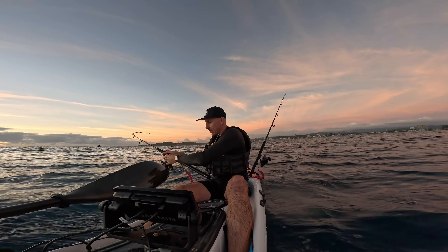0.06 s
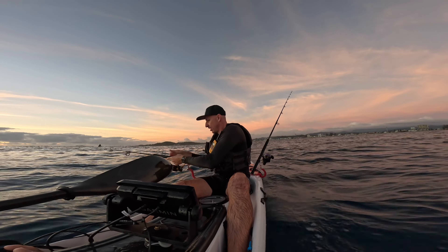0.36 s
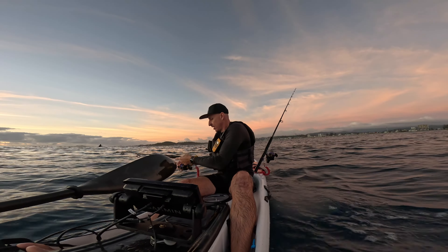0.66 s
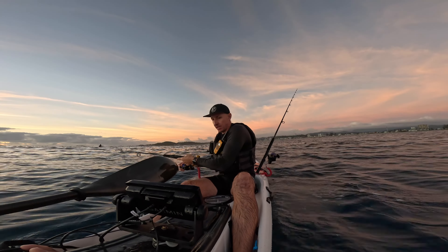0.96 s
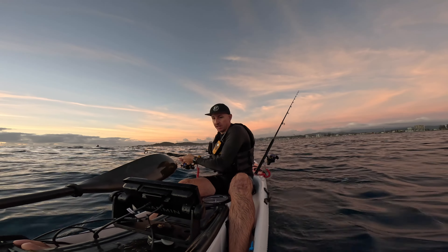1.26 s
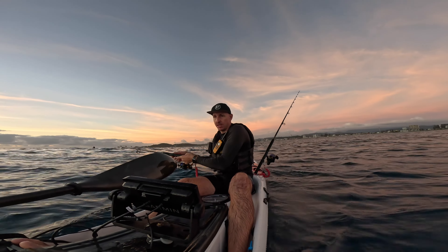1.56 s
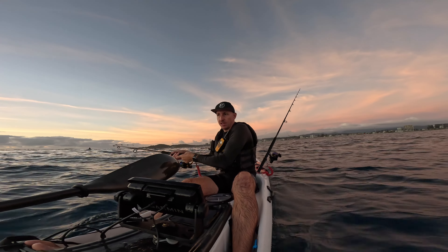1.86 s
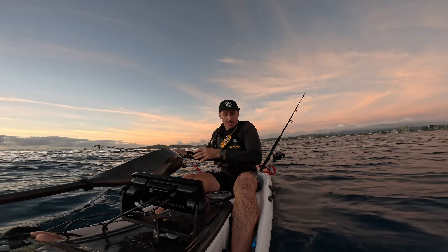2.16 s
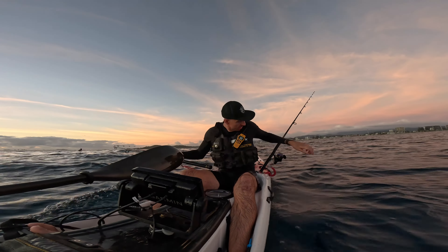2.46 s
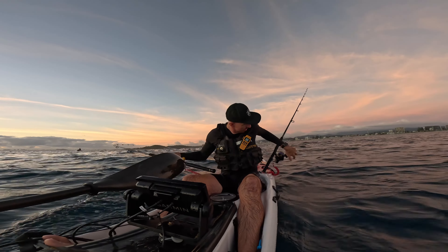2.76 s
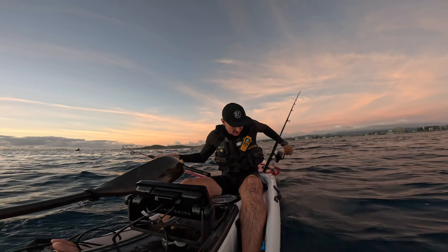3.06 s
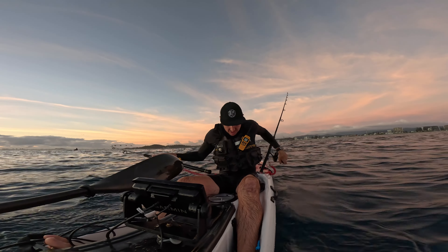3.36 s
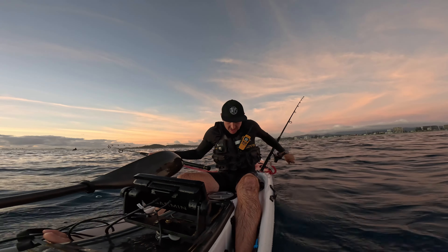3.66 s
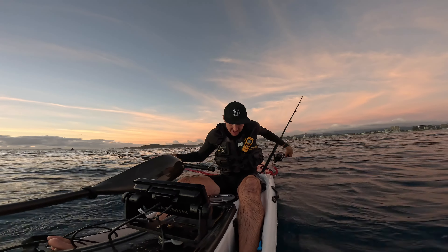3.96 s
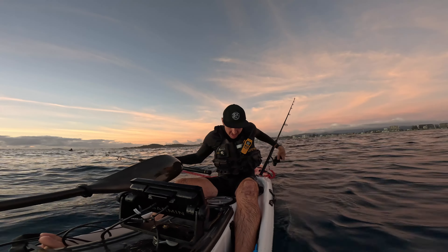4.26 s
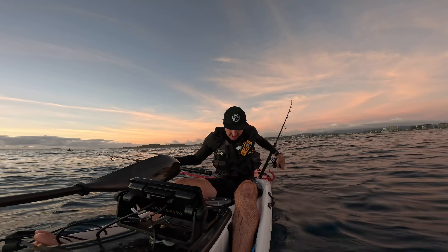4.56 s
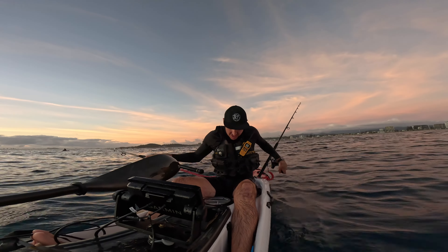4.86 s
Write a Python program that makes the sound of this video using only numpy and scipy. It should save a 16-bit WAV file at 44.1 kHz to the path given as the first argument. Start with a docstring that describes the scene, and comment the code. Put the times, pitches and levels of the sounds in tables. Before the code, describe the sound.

Two fishing reels whine as line runs out, over a low hum, water sloshing against a kayak and wind buffeting the microphone.

```python
"""On a kayak at sea, a hand reel gives line: its pawl (a small catch) clicks so fast that it whines.
A taut line hums, lower as the boat slows; water slops, wind buffets the microphone and tackle ticks.
After a second, a reel in the rod holder swells in; then the fish starts tugging at the hand reel.
From about 4 seconds a rotor chirps, and tackle knocks twice on the hull. Near 7 seconds the holder reel
stops dead and the hand reel slows to single clicks, then runs off again in stronger wind."""
import sys
import numpy as np
from scipy import signal
from scipy.fft import rfft, irfft, next_fast_len
from scipy.io import wavfile
from scipy.ndimage import uniform_filter1d, map_coordinates

SR = 44100
rng = np.random.default_rng(int(sys.argv[2]) if len(sys.argv) > 2 else 0)


def dump(signal):
    """Clip the signal to [-1, 1] and save it as 16-bit WAV at the path in sys.argv[1]."""
    limited = np.clip(np.atleast_2d(signal).T, -1, 1)
    pcm = np.round(limited * 32767).astype(np.int16)
    wavfile.write(sys.argv[1], SR, pcm)


N = 397341

# The hand reel's speed between lunges. Each row: time in seconds, clicks per second.
HAND_SPEED = [(0, 460), (4.6, 399), (6.2, 637), (6.82, 55), (7, 63), (7.18, 40), (7.31, 76), (7.39, 30),
              (7.54, 90), (7.66, 22), (7.73, 62), (7.82, 50), (7.96, 131), (8.2, 547), (9, 714)]
# Its loudness between tugs and lunges. Each row: time in seconds, spool ring in dB, pawl spring in dB.
HAND_LEVELS = [(.15, -48, -56.5), (.55, -51, -61.5), (1.6, -55.5, -49.5), (2, -45.5, -52),
               (3.7, -44.5, -46), (4.4, -45.5, -48), (5.15, -38.5, -46.5), (6.15, -45.5, -42.5),
               (6.9, -44.5, -52), (7.45, -51, -54.5), (7.85, -45.5, -54.5), (8.2, -31, -37.5),
               (9, -33, -42.5)]
# Its spool's note. Each row: time in seconds, pitch in Hz.
SPOOL_PITCH = [(.8, 1733), (2.2, 1685), (7.8, 1667), (9, 1718)]
# Its body's rattle, before a cap. Each row: time in seconds, level in dB.
RATTLE_LEVEL = [(1.5, -70), (6.85, -61.5), (7.87, -56), (8.18, -41.5), (9.01, -38)]
# How its spring and body ring. Each row: pitch in Hz, width in Hz, level in dB.
SPRING_RING = [(3688, 130, 26), (3988, 290, 22.5)]
HAND_BODY_RING = [(2300, 300, 2), (3070, 170, 3.5), (5650, 310, 0), (11000, 230, -22)]
# Tugs swell the spool's ring; in lunges the spool races and the spring buzzes.
# Each row: middle in seconds, length in seconds, boost in dB.
TUGS = [(2.12, 0.064, 6.5), (2.35, 0.048, 8), (2.88, 0.2, 12.5), (3.16, 0.095, 10.5), (3.32, 0.1, 10),
        (3.52, 0.086, 7), (5.68, 0.082, 6), (6.15, 0.21, 11.5), (7.292, .095, 8.9), (7.54, 0.16, 12.5),
        (8.29, 0.043, 10), (8.91, 0.11, 7)]
LUNGES = [(1.87, .28, 9), (2.78, .38, 8.5), (3.2, .44, 11), (4.9, .07, 7.5), (5.13, .27, 11)]
# The taut line's hum. Each row: time in seconds, pitch in Hz, level in dB.
LINE_HUM = [(0.0, 124.1, -36.5), (1, 121.7, -29), (2.87, 118.4, -31.5), (3.92, 107.4, -27.5),
            (4.98, 105.2, -30), (5.45, 98.8, -35.5), (6.7, 96.6, -32.5)]
# The freshening breeze. Each row: time in seconds, buffet in dB, rush in dB.
WIND_LEVELS = [(0, -37, -35.5), (1.2, -34, -31.5), (4.7, -34, -33.5), (6, -23.5, -30.5), (6.9, -26, -31),
               (7.9, -21, -27.5), (8.3, -17, -21.5), (8.85, -25, -32)]
# Gusts on top. Each row: middle in seconds, length in seconds, buffet boost in dB, rush boost in dB.
GUSTS = [(1.68, .12, 10, 0.5), (2.87, 0.089, 12, 2.5), (4.97, 0.073, 11.5, -1), (5.23, 0.09, 14, 0),
         (6.01, 0.079, 8, 1), (6.44, 0.1, 10, 1.5), (6.69, 0.14, 11, 1), (7, 0.061, 9.5, 4.5),
         (7.7, .08, 7.5, 12.5), (8.13, 0.12, 3.5, 4.5), (8.98, 0.091, 5, 15)]
# Water washing along the hull. Each row: time in seconds, level in dB.
WASH_LEVEL = [(0.0, -41), (0.58, -47), (1.4, -41.5), (6.52, -39), (7.2, -48.5), (8.4, -38)]
# Bigger slops. Each row: start in seconds, level in dB, bubble pitch in Hz.
SLOPS = [(0.023, -24, 587), (1.84, -27, 682), (2.02, -31, 1140), (2.405, -27, 840), (7.683, -26, 482),
         (7.818, -25, 616), (8.028, -22, 284), (8.118, -26, 330), (8.325, -22, 290), (8.417, -15, 421.2),
         (8.596, -19, 610)]
# The tone of each noisy sound. Each row: frequency in Hz, relative level in dB.
HAND_RASP_TONE = [(400, -26), (1100, -17), (2500, -7), (4400, -6.5), (6400, -3), (7600, -20),
                  (10000, -18.5), (14000, -47)]
BUFFET_TONE = [(12, -7), (28, -4), (70, -8), (140, -22.5), (2400, -120)]
RUSH_TONE = [(40, -7), (150, -1), (300, -8.5), (520, -20.5), (2000, -51.5), (9000, -120)]
WASH_TONE = [(420, 1), (1100, -5), (2000, -9), (15000, -42)]
HOLDER_RASP_TONE = [(400, -17), (1100, 7.5), (3000, 3), (4800, 4.5), (5750, 8.5), (6600, 4), (7400, 4.5),
                    (8100, -1.5), (9500, -2), (10700, -17.5), (15000, -45)]
HIGH_HISS_TONE = [(5000, -38), (11800, 9), (15500, -8)]
# Light tackle ticks. Each row: start in seconds, level in dB.
TICKS = [(.28, -41), (7.706, -39), (8.128, -29.5)]
# How the tackle, holder reel and rotor ring. Each row: pitch in Hz, width in Hz, level in dB.
TICK_RING = [(2840, 1000, -2), (3900, 750, -2)]
HOLDER_BODY_RING = [(6100, 230, 5.5), (11600, 250, -18)]
HOLDER_PAWL_RING = [(7116, 190, -2.5)]
ROTOR_RING = [(3050, 520, 0)]
# The holder reel's speed. Each row: time in seconds, clicks per second.
HOLDER_SPEED = [(1.6, 560), (2.02, 930), (2.3, 300), (2.78, 630), (3.95, 380), (4.3, 240), (4.69, 140),
                (5, 650), (6.2, 450), (6.5, 115), (6.82, 160)]
# Its loudness at its usual speed. Each row: time in seconds, ring in dB, rasp in dB.
HOLDER_LEVELS = [(0, -66, -80), (1.1, -61, -73), (1.4, -62.5, -53), (2, -51.5, -49), (2.4, -50.5, -46.5),
                 (2.78, -40.5, -45), (3.1, -44.5, -43.5), (3.85, -39.5, -40.5), (4.6, -45, -38),
                 (5.2, -40.5, -37), (6.2, -40.5, -37.5), (6.8, -46, -37)]
# The rotor's speed. Each row: time in seconds, turns per second.
ROTOR_SPEED = [(4.8, 15.1), (4.92, 16.4)]
# Its loudness. Each row: time in seconds, level in dB.
ROTOR_LEVEL = [(3, -80), (4.2, -48), (6.2, -43), (6.4, -40)]
# Tackle hitting the hull. Each row: start in seconds, level in dB.
KNOCKS = [(5.451, -18.5), (6.52, -17.5)]
# The hull's notes. Each row: pitch in Hz, level in dB, seconds to fade by 60 dB.
HULL_NOTES = [(421, 9, 0.075), (751, 8, 0.038), (1022, 8, 0.03), (1400, 6.5, 0.011), (1720, 5, 0.014)]
# How wide the scene sounds. Each row: time in seconds, width from 0 (mono) to 1.
STEREO_WIDTH = [(1.1, 0), (2.2, 0.34), (6.8, 0.49), (6.85, 0)]
# A brief dip in loudness. Each row: middle in seconds, length in seconds, change in dB.
LEVEL_DIP = [(.606, 0.012, -15)]

TEETH_PER_TURN = 8.3
SLOW_CLICK_S = 6.831  # the hand reel's first click that stands alone


def amp(db):
    """Turn decibels into a multiplier."""
    return 10 ** (np.asarray(db) / 20)


def unit(x):
    """Scale x to an average (rms) level of 1."""
    return x / np.sqrt(np.mean(x ** 2) + 1e-20)


def steady(x, size):
    """Hold x near level 1 over stretches of size samples."""
    return x / np.sqrt(np.abs(uniform_filter1d(x ** 2, size=size)) + 1e-9)


def noise():
    """White noise: an even hiss."""
    return rng.standard_normal(N)


def curves(rows):
    """Join the rows with straight lines: one curve for each column after the time."""
    times, *columns = np.transpose(rows)
    return [np.interp(np.arange(N) / SR, times, column) for column in columns]


def swells(rows, order=2):
    """Smooth bumps: one curve for each column after time and length. A high order flattens their tops."""
    t = np.arange(0, N + 32, 32) / SR
    middle, length, *columns = np.transpose(rows)
    bumps = np.exp(-np.abs(2 * (t - middle[:, None]) / length[:, None]) ** order)
    return curves(np.transpose([t] + [column @ bumps for column in columns]))


def wobble(rate):
    """A smooth curve through rate random values a second."""
    steps = np.arange(0, N + 32, 32)
    knots = rng.standard_normal(int(N * rate / SR) + 4)
    return np.interp(np.arange(N), steps, map_coordinates(knots, [steps * rate / SR]))


def filtered(x, response):
    """Multiply each frequency in x by response(frequency)."""
    size = next_fast_len(N + SR // 2)
    return irfft(rfft(x, size) * response(np.fft.rfftfreq(size, 1 / SR)), size)[..., :N]


def coloured(x, tone):
    """Shape x with a tone table, at level 1."""
    freqs, db = np.transpose(tone)
    return unit(filtered(x, lambda hz: amp(np.interp(np.log(hz + 1), np.log(freqs), db))))


def dull(x, edge_hz, order):
    """Turn down the treble above edge_hz."""
    return filtered(x, lambda hz: 1 / np.sqrt(1 + (hz / edge_hz) ** (2 * order)))


def resonate(x, rings):
    """Let x ring at the pitches of a ring table, at level 1."""
    def response(f):
        return sum((-1) ** k * amp(db) * (1 + 1j * (f - hz * hz / (f + 1e-3)) / (1.55 * width)) ** -2
                   for k, (hz, width, db) in enumerate(rings))
    return unit(filtered(x, response))


def shifted(x, hz):
    """Slide all frequencies in x by a curve in Hz."""
    return np.real(signal.hilbert(x) * np.exp(2j * np.pi * np.cumsum(hz) / SR))


def place(mid, side, lean=0):
    """Make left and right from a shared part and a side part; a lean above 0 is to the left."""
    apart = curves(STEREO_WIDTH)[0] * (side + lean * mid)
    return np.array([mid + apart, mid - apart])


def ratchet(rate, tick_db, snap_s, sway_db, scrape, skid):
    """A pawl ticks off each tooth and chatters briefly; its force sways once per turn of the spool."""
    # the faster the teeth pass, the less evenly the pawl catches them
    teeth = np.cumsum(rate * (1 + skid * rate / 600 * wobble(150))) / SR
    teeth = teeth - teeth[round(SLOW_CLICK_S * SR)]
    ticks = np.diff(np.floor(teeth), prepend=np.floor(teeth[0])) * np.sqrt(SR * snap_s / 2)
    chatter = (np.exp(-(teeth % 1) / rate / snap_s) + scrape) * noise()
    flick = np.sqrt(np.minimum(rate, 90))
    sway = amp(sway_db * np.sin(2 * np.pi * teeth / TEETH_PER_TURN) + wobble(20))
    return steady(flick * (amp(tick_db) * ticks + chatter) * sway, size=SR // 5)


def spool_song(rate, tug_db):
    """A fast spool sings a firm note that pulses once a turn and sags as a tug begins and ends."""
    sag_hz = 104.8 * tug_db * np.exp(1.5 - tug_db)
    hz = curves(SPOOL_PITCH)[0] - sag_hz + 30 * wobble(24)
    angle = 2 * np.pi * np.cumsum(rate) / SR / TEETH_PER_TURN
    note = np.sin(2 * np.pi * np.cumsum(hz) / SR + 0.56 * np.sin(angle))
    return unit(note * (1 + .5 * np.cos(angle)))


def hand_reel(spool_hz=1690, clicks_per_lunge_db=20):
    """Each click of the pawl rings the spool, the pawl's spring and the reel's body."""
    tug_db, lunge_db = swells(TUGS)[0], swells(LUNGES, order=6)[0]
    rate = curves(HAND_SPEED)[0] + clicks_per_lunge_db * lunge_db
    ring_db, spring_db = curves(HAND_LEVELS)
    ring_db, spring_db = ring_db + tug_db, spring_db + lunge_db
    tick_db = 3 + 10 * np.clip(1 - rate / 250, 0, 1)  # slow clicks are crisper
    force = ratchet(rate, tick_db, snap_s=.0022, sway_db=1.2, scrape=.06, skid=.05)
    ring = steady(resonate(force, [(spool_hz, 90, 0)]), size=SR // 9)
    ring = shifted(ring, curves(SPOOL_PITCH)[0] - spool_hz)  # the pull on the line shifts the note
    # singing takes over at speed, most of all in a tug
    song_share = np.clip(rate / 310 - .5, 0, 1) * np.clip(1 - .8 * amp(-tug_db), 0, 1)
    ring = np.sqrt(1 - song_share) * ring + np.sqrt(song_share) * spool_song(rate, tug_db)
    # the spring's buzz wavers, and rises in a lunge
    spring = shifted(resonate(force, SPRING_RING), 5 * lunge_db + 40 * wobble(20))
    # the body is shaken through the spring, so the spring caps its level
    body_db = np.minimum(curves(RATTLE_LEVEL)[0], spring_db + 1.5)
    body = resonate(force, HAND_BODY_RING) + amp(-4) * coloured(force, HAND_RASP_TONE)
    mid = amp(ring_db + wobble(9.8)) * ring + amp(spring_db) * spring + amp(body_db) * body
    return place(mid, amp(spring_db - 2.5) * resonate(noise(), SPRING_RING))


def line_hum():
    """The taut line strums in the passing water; its note sinks as the boat slows."""
    hz, db = curves(LINE_HUM)
    phase = 2 * np.pi * np.cumsum(hz * (1 + 0.0055 * wobble(14))) / SR
    note = np.sqrt(2) * (np.sin(phase) + amp(-17) * np.sin(2 * phase))
    return place(amp(db + 0.79 * wobble(4.1)) * note, 0)


def wind():
    """Swirls of air thump on the microphone under a lumpy rush."""
    buffet_db, rush_db = np.add(curves(WIND_LEVELS), swells(GUSTS))
    buffet = place(coloured(noise(), BUFFET_TONE), amp(-6) * coloured(noise(), BUFFET_TONE), lean=-0.66)
    rush_side = amp(-14) * coloured(noise(), RUSH_TONE)
    rush_db += 1.65 * wobble(22)
    rush = place(coloured(noise(), RUSH_TONE), rush_side, lean=-0.095)
    return amp(buffet_db) * buffet + amp(rush_db) * rush


def bubble(t, hz, cycles):
    """A pocket of air rings and rises in pitch as it nears the surface."""
    age = t * hz / cycles
    note = np.sin(2 * np.pi * hz * t * (1 + 0.042 * np.minimum(age, 4)))
    return note * np.exp(-age) * (1 - np.exp(-t * hz))


def water(small_bubbles=900, bubbles_per_slop=6, scatter_s=0.018):
    """Little waves wash along the hull and shed bubbles; bigger ones slop against it and gurgle."""
    level = amp(curves(WASH_LEVEL)[0])
    t = np.arange(SR // 8) / SR
    bubbles, gulps, splash = np.zeros((3, N + SR))
    for when, pitch, strength in rng.random((small_bubbles, 3)):
        bubbles[int(when * N):][:len(t)] += amp(13 * strength ** 3) * bubble(t, 420 * 4 ** pitch, 4)
    for start, db, hz in SLOPS:
        gulps[round(start * SR):][:len(t)] += amp(db) * bubble(t, hz, cycles=5)
        for lateness, pitch, softness in rng.random((bubbles_per_slop, 3)):
            delay = -scatter_s * np.log(1 - lateness)
            follower = amp(db - 0.5 - 10 * softness) * bubble(t, hz * 2 ** (pitch - .3), cycles=2.6)
            gulps[round((start + delay) * SR):][:len(t)] += follower
        splash[round(start * SR):][:len(t)] += amp(db - 8.5) * np.exp(-t / scatter_s)
    wash = amp(wobble(14)) * coloured(noise(), WASH_TONE) + amp(-10) * unit(bubbles[:N])
    slops = dull(gulps[:N] + splash[:N] * coloured(noise(), WASH_TONE), 4800, order=6)
    return place(level * wash + slops, level * amp(-7) * coloured(noise(), WASH_TONE))


def tackle_ticks(fade_s=0.015):
    """As the rod is handled, small hard parts tap together and ring very briefly."""
    taps, t = np.zeros(N + SR), np.arange(SR // 16) / SR
    for start, db in TICKS:
        taps[round(start * SR):][:len(t)] += amp(db) * np.exp(-t / fade_s)
    return place(taps[:N] * resonate(noise(), TICK_RING), 0)


def holder_reel(stop_s=6.82, usual_rate=510, db_per_doubling=3, sink_hz_per_s=42, in_tune_s=3.2):
    """Bright metal rings and the pawl rasps; a faint, steady high hiss runs until the spool stops."""
    t = np.arange(N) / SR
    rate = curves(HOLDER_SPEED)[0]
    ring_db, rasp_db = curves(HOLDER_LEVELS) + db_per_doubling * np.log2(rate / usual_rate)
    running = np.clip((stop_s - t) / .006 + .5, 0, 1)
    warble_hz = 50 * wobble(22)  # the loose pawl wavers as it rides the teeth
    drift_hz = sink_hz_per_s * (in_tune_s - t)  # the ring sinks as the spool empties

    def whine():
        force = ratchet(rate, tick_db=2, snap_s=.0011, sway_db=1.9, scrape=.36, skid=.022)
        pawl = shifted(resonate(force, HOLDER_PAWL_RING), warble_hz) * amp(-10 + 1.1 * wobble(16))
        rasp = coloured(force, HOLDER_RASP_TONE) + pawl
        ring = shifted(resonate(force, HOLDER_BODY_RING), drift_hz + warble_hz / 2)
        return running * (amp(ring_db + 0.64 * wobble(14)) * ring + amp(rasp_db) * rasp)
    mid = whine() + amp(-70) * running * coloured(noise(), HIGH_HISS_TONE)
    hiss = running * coloured(noise(), HIGH_HISS_TONE)
    fine_hiss = amp(-69.5) * (hiss - dull(hiss, 11200, order=16))
    side = dull(amp(1) * whine() + 0.39 * mid, 8100, order=12)  # leans left below the highest treble
    return place(mid, side) + np.array([fine_hiss, -fine_hiss])


def rotor(last_rub_s=6.802, fall_hz_per_turn=900):
    """A reel's spinning rotor rubs once a turn with a falling chirp, never twice alike."""
    turns = np.cumsum(curves(ROTOR_SPEED)[0]) / SR
    turns = turns - turns[round(last_rub_s * SR)]
    rubbing = np.cos(np.pi * turns) ** 4 * (turns < .5)
    ring = resonate(noise(), ROTOR_RING)
    chirp = shifted(ring, fall_hz_per_turn * (.5 - (turns + .5) % 1 + .2 * wobble(10)))
    return place(amp(curves(ROTOR_LEVEL)[0] + 2 * wobble(10)) * rubbing * chirp, 0, lean=0.33)


def hull_knocks(bounce_s=.0037):
    """Tackle strikes the hollow plastic hull and bounces once."""
    knocks, t = np.zeros(N + SR), np.arange(SR // 8) / SR
    for start, db in KNOCKS:
        for delay, blow_db in [(0, -6), (bounce_s, -15)]:
            ring = 0
            for k, (hz, note_db, fade_s) in enumerate(HULL_NOTES):
                fade = amp(note_db + rng.normal(0, 1) - 60 * t / fade_s)
                ring += (-1) ** k * fade * np.sin(2 * np.pi * hz * t)
            crack = 4.1 * amp(-60 * t / 0.0093) * rng.standard_normal(len(t))
            knocks[round((start + delay) * SR):][:len(t)] += amp(db + blow_db) * (ring + crack)
    return place(dull(knocks[:N], 5000, order=6), 0)


def scene():
    """Both reels, the line, wind, water and tackle, heard from the front of the kayak."""
    reels = hand_reel() + holder_reel() + rotor()
    return reels + line_hum() + wind() + water() + hull_knocks() + tackle_ticks()


def record(dry):
    """The level dips briefly once, and the very highest treble is cut off."""
    return filtered(dry * amp(swells(LEVEL_DIP)[0]), lambda hz: hz < 15700)


dry = scene()
out = record(dry)
dump(out)
```